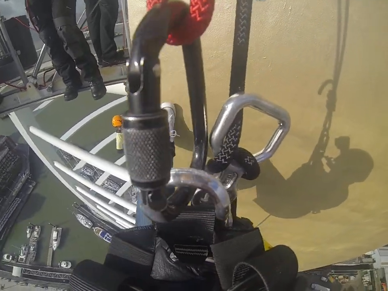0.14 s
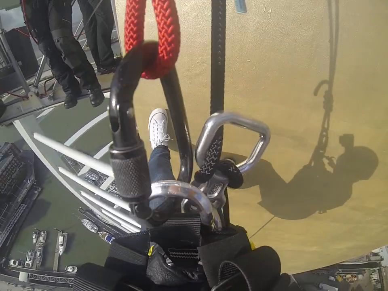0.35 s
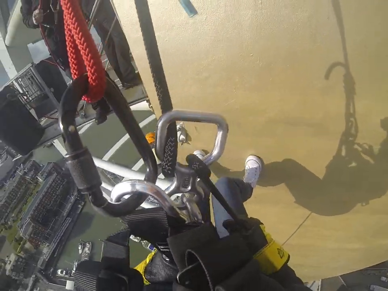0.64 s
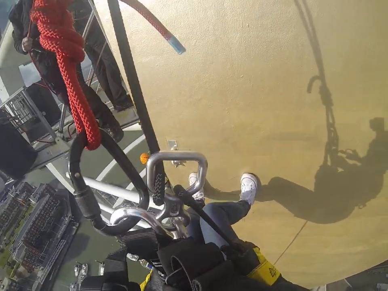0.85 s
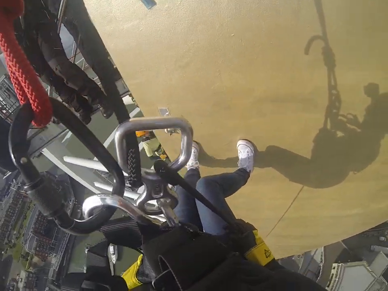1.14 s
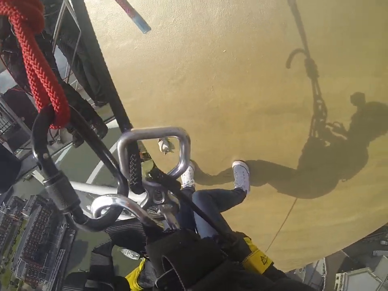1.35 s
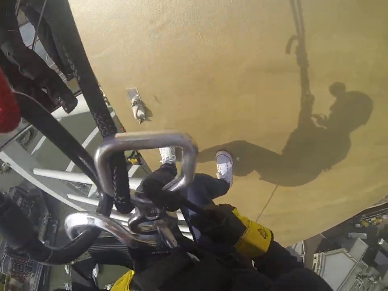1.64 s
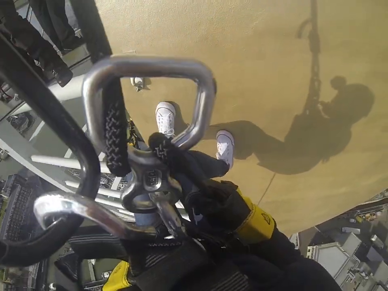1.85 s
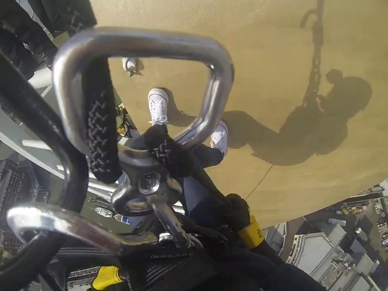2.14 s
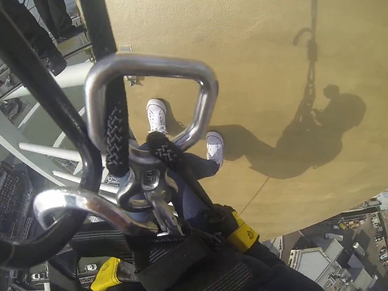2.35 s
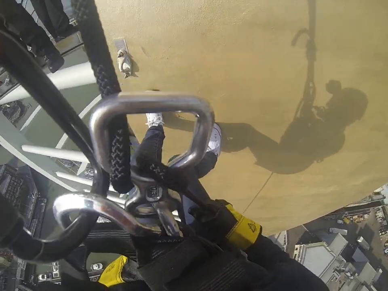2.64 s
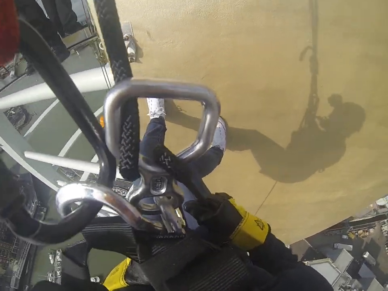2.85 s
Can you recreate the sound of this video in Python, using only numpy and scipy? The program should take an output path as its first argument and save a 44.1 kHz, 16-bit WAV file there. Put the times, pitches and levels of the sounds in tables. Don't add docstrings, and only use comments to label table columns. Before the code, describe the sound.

Hard, dry clacks and dull thumps from climbing gear come irregularly, strongest around the middle, then lighter taps and a short rasping rope slip at the end; low gusts, faint distant city air, boxy body-worn microphone.

```python
import sys
import numpy as np
from scipy import signal
from scipy.io import wavfile
from scipy.ndimage import uniform_filter1d

SR = 44100
rng = np.random.default_rng(int(sys.argv[2]) if len(sys.argv) > 2 else 0)


def level_to_linear(level):
    exponent = np.asarray(level, float) / 20
    return 10 ** exponent


def bounce(signal):
    frames = np.transpose(np.atleast_2d(signal))
    limited = np.clip(frames, -1, 1)
    pcm = np.round(limited * 32767).astype(np.int16)
    wavfile.write(sys.argv[1], SR, pcm)


N = 132300

# (frequency [Hz], level [dB], decay time t60 [s])
CASE = [(819.5, -8, 0.024), (1051.7, 3.5, 0.02), (1244, -9, 0.037), (1576, 0.66, 0.026),
        (1629, -1.5, 0.0097), (2090, -10.5, 0.036), (2394, -6, 0.014), (2760, -13.5, 0.019),
        (3290, -17, 0.0091), (3618, -19.5, 0.012), (4170, -38, 0.016), (4990, -28.5, 0.007)]
# (frequency [Hz], level [dB], decay time t60 [s])
MOUNT = [(105.7, 2.5, 0.16), (126, -6, 0.084), (176.3, -6, 0.11), (278.7, -14, 0.059),
         (398.8, -14.5, 0.062), (511, -14, 0.037)]


def rms_one(x):
    return x / np.sqrt(np.mean(x ** 2) + 1e-20)


def in_time(rows):
    s, *columns = np.transpose(rows)
    return [np.interp(np.arange(N) / SR, s, c) for c in columns]


def drift(rate):
    step = 40
    r = np.exp(-2 * np.pi * rate * step / SR)
    white = rng.standard_normal(N // step + 2002)
    slow = signal.lfilter([1], [1, -2 * r, r * r], white)[2000:]
    return np.interp(np.arange(N) / step, np.arange(len(slow)), rms_one(slow))


def ring(x, hz, t60):
    r = level_to_linear(-60 / (max(t60, 1e-3) * SR))
    w = 2 * np.pi * hz / SR
    return signal.lfilter([0, np.sin(w)], [1, -2 * r * np.cos(w), r * r], x + 1e-18)


def peak(x, hz, width):
    r = np.exp(-np.pi * width / SR)
    poles = [1, -2 * r * np.cos(2 * np.pi * hz / SR), r * r]
    return signal.lfilter([(1 - r * r) / 2, 0, (r * r - 1) / 2], poles, x)


def coloured(spectrum, patchy_db):
    hz, db = np.transpose(spectrum)
    edges = hz[0] * 2 ** np.arange(0, np.log2(hz[-1] / hz[0]) + .01, .5)
    out, white, together = 0, rng.standard_normal((2, N + SR)), drift(1.3)
    for k, low in enumerate(edges):
        high = min(low * 2 ** .5, .45 * SR)
        band_pass = signal.butter(2, [low, high], "band", fs=SR, output="sos")
        band = signal.sosfilt(band_pass, white[k % 2])[SR:]
        level = np.interp(np.log(low * 1.126), np.log(hz), db)
        flicker = patchy_db * (0.077 * together + drift(5.7))
        out = out + band * level_to_linear(level + flicker)
    return rms_one(out)


def grains(rate, spread_db):
    sizes = level_to_linear(spread_db * np.minimum(rng.exponential(1, N), 4.0)) * rng.choice([-1, 1], N)
    return sizes * (rng.random(N) < rate / SR)


def strikes(s, db, low_db, mid_db, high_db, contact_s):
    out, size = np.zeros(N + SR), 2400
    t = np.arange(size) / SR
    chatter = rng.standard_normal((len(s), size))
    crack = rng.standard_normal((len(s), size))
    spread = rng.standard_normal((len(s), len(CASE)))
    colour_hz = [850, 1050, 1400, 1800, 2000, 2400, 3400]
    touch = np.exp(-(t / contact_s) ** 2)
    for k in range(len(s)):
        body = 0
        colour_db = [low_db[k] / 3, low_db[k], 0, 0, mid_db[k], mid_db[k], high_db[k]]
        for (hz, level, t60), z in zip(CASE, spread[k]):
            push = touch * (3.01 * chatter[k] + np.cos(2 * np.pi * hz * t + 9 * z))
            mode = ring(peak(push, hz, .3 * hz), hz * (1 + .006 * z), t60)
            colour = np.interp(hz, colour_hz, colour_db)
            body = body + level_to_linear(level + colour + 4 * z) * mode / np.abs(mode).max()
        snap = peak(peak(crack[k], 5500, 4400), 6000, 5500) * np.exp(-t / 0.0022)
        crack_db = -37 + 1.48 * high_db[k]
        body = body / np.abs(body).max() + level_to_linear(crack_db) * snap
        i = int((s[k] - .001) * SR)
        out[i:i + size] += level_to_linear(db[k]) * body
    return out[:N]


def jolts():
    # (time [s], peak level [dB], pitch [Hz], relative thud level [dB], decay to -60 dB [cycles])
    blows = [(0.061, -32.5, 109, -9.5, 6.6), (0.11, -23.5, 112, 3, 8.4), (0.166, -28, 113, -17, 11.3),
             (0.302, -26.5, 147, -2, 6.6), (0.337, -29, 90.6, -32, 14), (0.435, -31, 120, -9, 13),
             (0.465, -32.5, 179, -9, 17), (0.502, -34, 109.7, -31, 31), (0.546, -32.5, 107, -42, 8),
             (0.597, -42, 106, -27, 19), (0.635, -34.5, 121, -4, 6.2), (0.651, -33.5, 193, -15, 7.3),
             (0.809, -32.5, 100.4, -38, 16), (0.841, -40.5, 148, -4.5, 11), (0.901, -31.5, 85, -9, 15),
             (1.002, -23.5, 148, -11.5, 7.2), (1.11, -24.5, 173, -2.5, 12.7), (1.124, -29.5, 153, 1, 5.9),
             (1.141, -22.5, 168, -13, 5), (1.365, -30.5, 115, -7, 10), (1.421, -25, 96, -5, 4.6),
             (1.584, -23, 161.5, -12.5, 11.3), (1.62, -33, 101.6, -41, 16.5), (1.962, -38, 98, -9.5, 12),
             (1.993, -38.5, 116, -2, 11), (2.034, -35.5, 111, -15.5, 14), (2.089, -35, 107, -7, 8),
             (2.157, -39.5, 147, -0.5, 4.4), (2.288, -35.5, 109, -7, 14), (2.346, -37, 107, -3, 8.4),
             (2.489, -29, 101.5, -9.5, 8.7), (2.549, -33.5, 103.7, -9, 20), (2.643, -29.5, 103, -17, 11),
             (2.691, -35.5, 109, -8.5, 10), (2.835, -34, 95.4, -12, 30)]
    out, t = np.zeros(N + SR), np.arange(SR // 4) / SR
    noises = rng.standard_normal((len(blows), len(t)))
    for (s, db, hz, thud_db, cycles), noise in zip(blows, noises):
        swing = 0
        for f, level in [(hz, 0), (MOUNT[0][0], -8.5)]:
            swing = swing + level_to_linear(level - 60 * t * f / cycles) * np.sin(2 * np.pi * f * t)
        swing = swing * (1 - np.exp(-t / 0.00042))
        push = noise * np.exp(-t / 0.0057)
        modes = [ring(peak(push, f, f), f, t60 / 2) for f, _, t60 in MOUNT[3:]]
        thud = sum(level_to_linear(-4 * k) * m / np.abs(m).max() for k, m in enumerate(modes))
        start = int((s + .002) * SR)
        out[start:][:len(t)] += level_to_linear(db - 0.5) * (swing + level_to_linear(thud_db - 6) * thud)
    return out[:N]


def hardware():
    # (time [s], peak level [dB], low modes [dB], middle modes [dB], high modes [dB])
    knocks = [(0.164, -20, -3.5, 3.5, 3), (0.338, -25, -9.5, -1.5, 3), (0.436, -30, 3.5, 0, -5),
              (0.468, -34, -1, -4, -8), (0.808, -34.5, -7, -2.5, -5), (0.901, -30, 1, 5.5, 7),
              (1.001, -18.5, -7, -2.5, 5.5), (1.11, -28.5, 6, 1.5, -7), (1.365, -23, -3.5, -2, -2.5),
              (1.425, -23.5, 1.5, 3, 3), (1.582, -14.5, -4, 0.5, 6.5), (2.092, -35, -1, 0.5, -9),
              (2.159, -35.5, -1.5, 1.5, -3), (2.344, -34.5, 1, 1, 2), (2.491, -21.5, -7.5, -1, 4)]
    # (time [s], peak level [dB], low modes [dB], middle modes [dB], high modes [dB])
    raps = [
        (0.112, -21, 1, -9, 6.5),
        (0.305, -29.5, -1.5, -12, 1.5),
    ]
    # (time [s], peak level [dB], low modes [dB], high modes [dB])
    light_taps = [(0.451, -37, -7, 7), (0.571, -39.5, -3, -1), (0.777, -47.5, 11, -5),
                  (0.842, -42.5, 16, -22), (1.042, -47.5, -12, 15), (1.059, -42, 0, -5),
                  (1.199, -47.5, 10, -18), (1.561, -36.5, -0.5, 1), (1.621, -40.5, -2, -6),
                  (1.824, -39, -24, 21.5), (1.961, -39.5, 3, -6), (1.992, -49, 1, 0), (2.032, -42.5, 3, 3),
                  (2.289, -40.5, 2, -11), (2.542, -45, 11, -8), (2.593, -41, -2, -12),
                  (2.641, -46.5, -1, -4), (2.692, -46, -4, -1)]
    contact_s, rap_contact_s = 0.0027, .0009
    s, db, low_db, high_db = np.transpose(light_taps)
    taps = strikes(s, db, low_db, high_db / 2, high_db, contact_s)
    hard = strikes(*np.transpose(knocks), contact_s)
    sharp = strikes(*np.transpose(raps), rap_contact_s)
    return hard + sharp + taps + jolts()


def scrapes():
    # (start [s], length [s], level [dB])
    drags = [(0.0, 0.037, -55.5), (0.042, 0.011, -72), (0.367, 0.044, -56.5), (0.438, 0.018, -47),
             (0.475, .015, -50), (0.499, 0.033, -54.5), (0.53, 0.043, -54.5), (0.595, .03, -52),
             (.636, 0.046, -50.5), (1.125, 0.036, -54), (1.982, 0.028, -60.5), (2.037, 0.03, -59),
             (2.541, 0.023, -50.5)]
    t, rub = np.arange(N) / SR, grains(1200, 3.0)
    drag, edge_s = 0, 0.0064
    for s, length, db in drags:
        edge = np.minimum(t - s, (s + length - t) / 3) / edge_s
        drag = drag + level_to_linear(db) * np.clip(edge, 0, 1)
    case = rms_one(sum(level_to_linear(db) * ring(peak(rub, hz, hz), hz, t60 / 2) for hz, db, t60 in CASE))
    body = rms_one(sum(ring(peak(rub, hz, hz), hz, t60 / 2) for hz, _, t60 in MOUNT[3:]))
    return drag * (case + level_to_linear(-0.5) * body)


def mount(pushes):
    soft = signal.lfilter([.001], [1, -1.92, .9216], pushes)
    return sum(level_to_linear(db) * ring(soft, hz, t60) for hz, db, t60 in MOUNT)


def movement():
    # (time [s], gust rumble level [dB], mount shaking level [dB])
    motion = [(0.0, -39, -46.5), (0.12, -35.5, -56.5), (0.33, -42, -55), (0.53, -28, -44),
              (0.63, -23.5, -44.5), (0.75, -38.5, -55), (0.95, -38.5, -51.5), (1.22, -35.5, -53.5),
              (1.45, -35.5, -48.5), (1.68, -34.5, -51), (1.79, -45.5, -61.5), (1.86, -45.5, -57),
              (1.96, -32.5, -46), (2.15, -39, -56.5), (2.3, -35.5, -59), (2.63, -33, -47.5),
              (2.8, -38, -49), (2.92, -33, -53.5), (3.0, -39, -58.5)]
    # (frequency [Hz], density [dB per Hz])
    gust_spectrum = [(7, -11.5), (14, 11.5), (28, -7.5), (45, -9)]
    gust_db, shake_db = in_time(motion)
    shake = rms_one(mount(grains(120, 4) + 0.05 * rng.standard_normal(N)))
    rub = grains(300, 3.0) * level_to_linear(4.0 * drift(10.0))
    rustle = rms_one(sum(level_to_linear(db) * ring(peak(rub, hz, hz), hz, t60) for hz, db, t60 in CASE[:7]))
    low_pass = signal.butter(4, 48, fs=SR, output="sos")
    gust = signal.sosfilt(low_pass, coloured(gust_spectrum, patchy_db=-2.5))
    return level_to_linear(gust_db) * gust + level_to_linear(shake_db + 4.5) * (shake + level_to_linear(-32.5) * rustle)


def rope_slip():
    # (time [s], level [dB])
    slip = [
        (2.759, -70),
        (2.766, -34.5),
        (2.778, -33),
        (2.79, -41),
        (2.818, -37.5),
        (2.84, -35),
        (2.85, -41.5),
        (2.935, -46.5),
        (3.0, -56.5),
    ]
    # (frequency [Hz], bandwidth [Hz], level [dB])
    slip_case_modes = [(1090, 550, -5), (1517, 130, 1.5), (1697, 56, 1), (2255, 184, 0), (2830, 460, -16),
                       (3750, 550, -17), (4880, 230, -20.5)]
    level_db, = in_time(slip)
    rub = grains(3000, 3.0) * level_to_linear(.7 * drift(45))
    tone = 0
    for k, (hz, width, db) in enumerate(slip_case_modes):
        mode = rms_one(peak(peak(rub, hz, width), hz, 7.0 * width))
        tone = tone + (-1) ** k * level_to_linear(db + 2.2 * drift(28)) * mode
    return level_to_linear(level_db) * rms_one(tone) * (np.arange(N) / SR > slip[0][0])


def air():
    # (frequency [Hz], bandwidth [Hz], level [dB])
    cavity = [(1010, 84, -98), (1522, 220, -60.5), (2253, 620, -68), (3335, 460, -79)]
    # (frequency [Hz], density [dB per Hz])
    air_spectrum = [(130, -25), (300, -1), (600, -7), (1300, -1), (2400, -14.5), (2950, -23), (4200, -17),
                    (6000, -35)]
    white, rings = rng.standard_normal(N), 0
    for hz, width, db in cavity:
        mode = rms_one(peak(peak(white, hz, width), hz, 2 * width))
        rings = rings + level_to_linear(db + 0.4 * drift(14.0)) * mode
    return rings + level_to_linear(-61.5) * coloured(air_spectrum, patchy_db=.8)


def electronics():
    # (frequency [Hz], density [dB per Hz])
    hiss = [(3500, -8), (6000, 7.5), (9500, 3), (14000, 6.5)]
    # whine, lower and upper tone (frequency [Hz])
    whine_hz = [6449.6, 12923]
    # whine, lower and upper tone (level [dB])
    whine_db = [-71, -65.5]
    bursts_per_s, burst_start, burst_end = 47.952, .2, .615
    frame, phase = np.divmod(np.arange(N) / SR * bursts_per_s, 1)
    on = uniform_filter1d(1. * (phase > burst_start) * (phase < burst_end), size=20)
    jump = rng.uniform(0, 2 * np.pi, int(frame[-1]) + 1)[frame.astype(int)]
    w = 2 * np.pi * np.arange(N) / SR
    flip = .5 * np.pi * (frame % 4 > 1)
    low = level_to_linear(whine_db[0]) * np.sin(whine_hz[0] * w + flip + .35 * jump)
    high = level_to_linear(whine_db[1]) * np.sin(whine_hz[1] * w + jump)
    return on * (low + high) + level_to_linear(-73.5) * coloured(hiss, patchy_db=0.6)


def scene():
    near = hardware() + scrapes() + movement() + rope_slip()
    return (near + air() + electronics())[None]


def top_cut(x):
    return signal.sosfilt(signal.butter(12, 15060, fs=SR, output="sos"), x)


def record(dry):
    low_pass = signal.cheby2(12, 60, 15450, fs=SR, output="sos")
    mix = signal.sosfilt(low_pass, dry)
    return top_cut(mix)


dry = scene()
out = record(dry)
bounce(out)
```